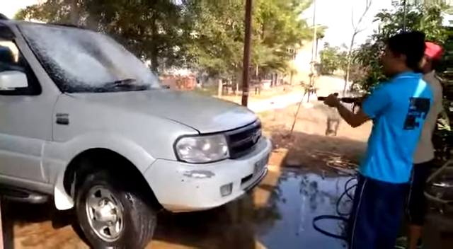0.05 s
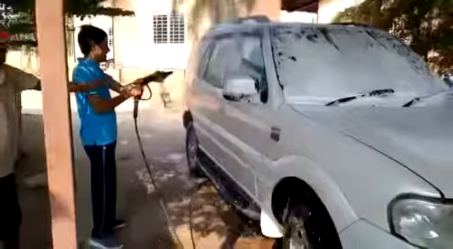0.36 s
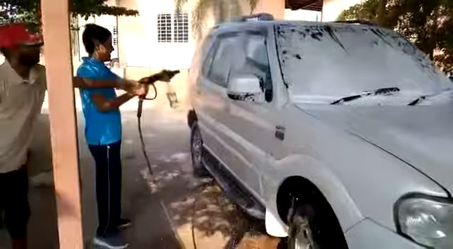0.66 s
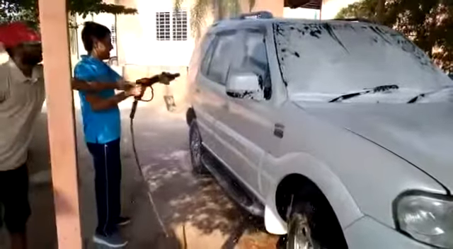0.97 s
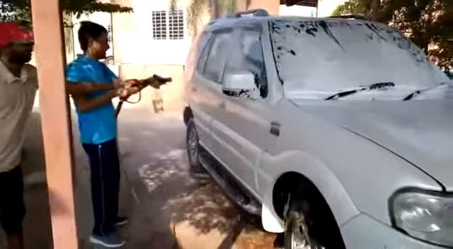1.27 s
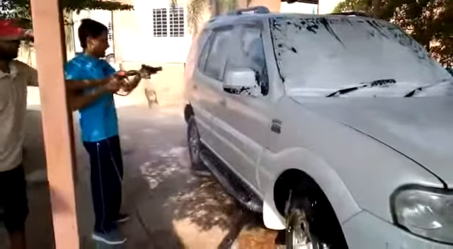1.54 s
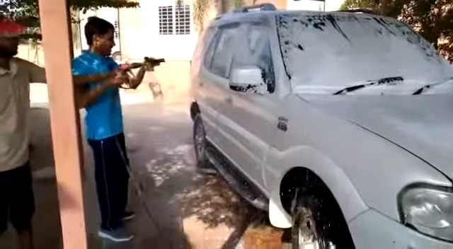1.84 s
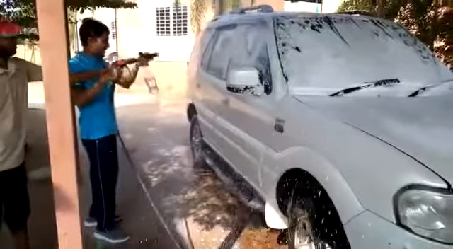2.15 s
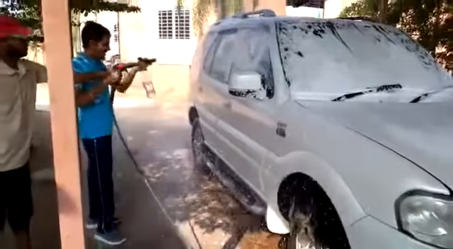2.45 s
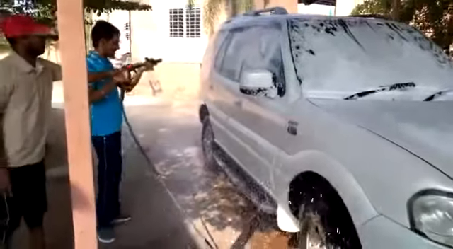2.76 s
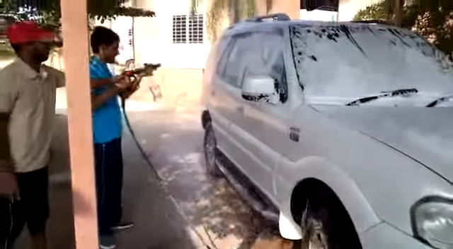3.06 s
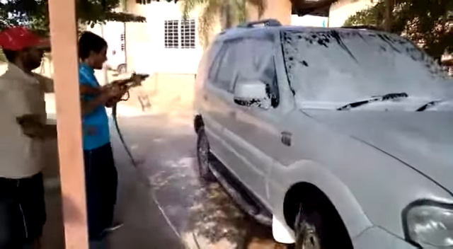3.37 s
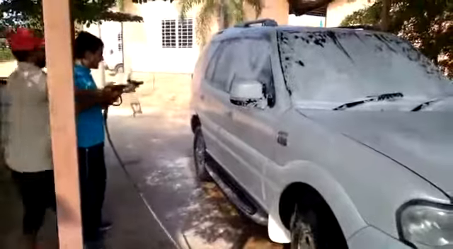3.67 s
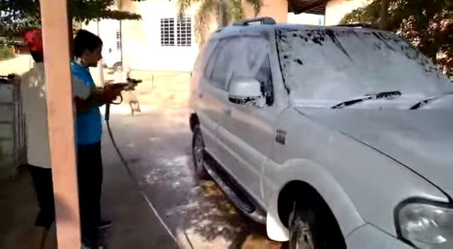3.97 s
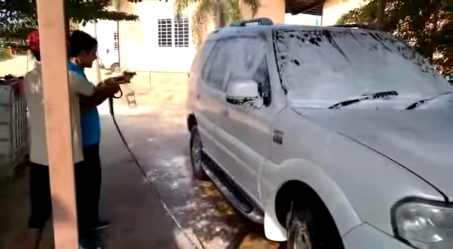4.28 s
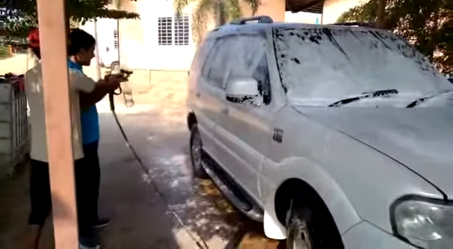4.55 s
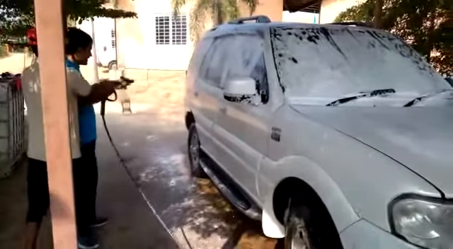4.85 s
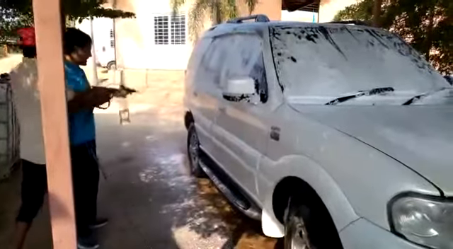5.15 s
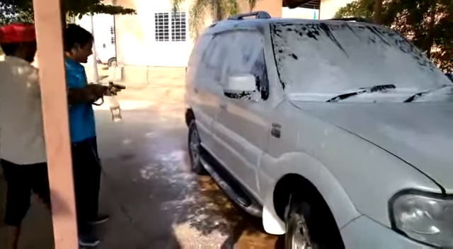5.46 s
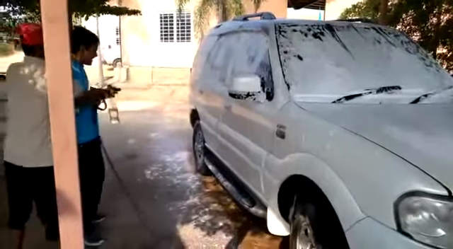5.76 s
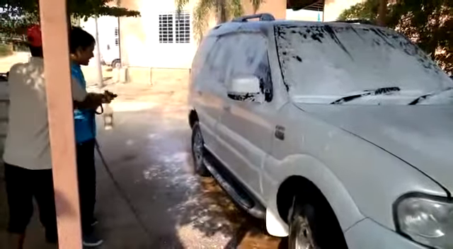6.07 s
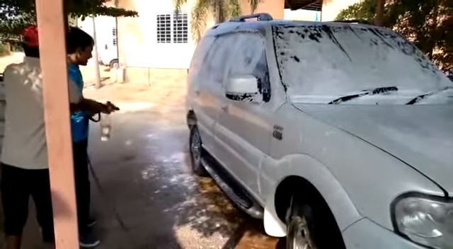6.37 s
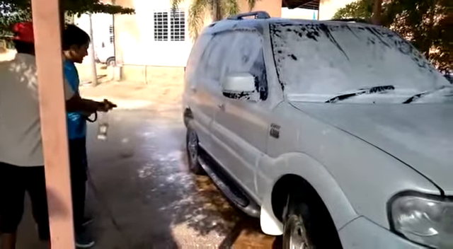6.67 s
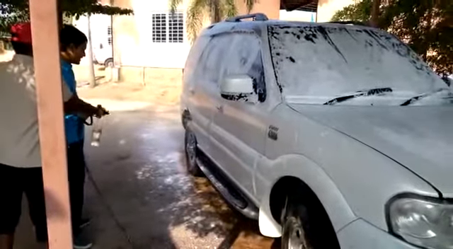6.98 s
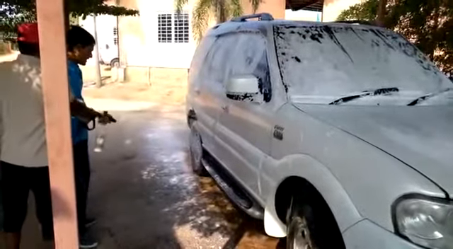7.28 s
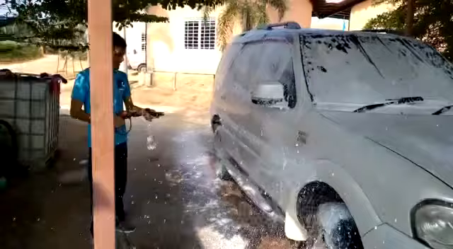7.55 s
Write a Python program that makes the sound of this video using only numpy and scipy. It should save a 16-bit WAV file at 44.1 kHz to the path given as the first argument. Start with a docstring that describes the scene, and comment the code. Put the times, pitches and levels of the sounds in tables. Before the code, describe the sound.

A pressure washer sprays a car outdoors from the very start: a shrill, steady hiss with a fine spatter of drops, its tone shifting as the jet moves across the bodywork. Behind it the motor and pump hum at a constant pitch with a fast, light rattle, over faint yard noise. The spray is strong around 0.7 to 1.4 seconds, then a little softer, drumming lightly on a metal panel at about 2.3 and 2.9 seconds. Near 4 seconds it eases and the hum swells forward. The jet returns by 4.6 seconds and drums again around 5. From about 5.4 to 6.8 seconds the spray is weaker, with two more dips, and the hum stands out. At 7.1 seconds the jet surges with a soft, low thump, hissing and drumming until the end at about 7.6 seconds. Overall loudness stays nearly even throughout.

```python
"""A yard, where a pressure washer rinses a car. The jet hisses from the nozzle, bursts into mist
and drops on the bodywork and now and then drums on a panel. Behind it the motor and three-piston
pump hum steadily over the yard's noise. The camera's gain control holds the loudness, so the hum
swells whenever the spray gets quieter."""
import sys
import numpy as np
from scipy import signal
from scipy.fft import rfft, irfft, next_fast_len
from scipy.io import wavfile
from scipy.ndimage import uniform_filter1d, map_coordinates

SR = 44100
rng = np.random.default_rng(int(sys.argv[2]) if len(sys.argv) > 2 else 0)


def master(y):
    """Save y as 16-bit WAV."""
    cut = np.clip(np.atleast_2d(y).T, -1, 1)
    pcm = np.round(cut * 32767)  # scale
    wavfile.write(sys.argv[1], SR, pcm.astype(np.int16))


N = 336042
TIME_S = np.arange(N) / SR


# Spray strength along the car: t/s, level/dB
SPRAY_SWEEP = [(0, -13), (.35, -15), (.68, -10.5), (1.35, -11.5), (1.8, -16.5), (2.26, -15.5),
               (2.42, -18.5), (2.85, -18.5), (3.3, -14.5), (4.62, -15), (4.85, -10), (5.22, -13),
               (5.38, -22), (6.2, -18.5), (6.87, -17), (7.11, -17.5), (7.135, -9), (7.62, -10)]
# Spray lulls: start/s, fade/s, hold/s, return/s, depth at hold start/dB, depth at hold end/dB
SPRAY_LULLS = [(3.77, 0.4, 0.21, 0.16, 10, 9), (5.578, 0.27, 0.14, 0.094, 3.5, 12),
               (6.417, .14, 0.23, .04, 10, 5)]

def spray():
    """One fan of water, swept by hand, drives hiss, splash and drumming."""
    lull_db = sum(np.interp(TIME_S, np.cumsum([start, fade, hold, back]), [0, first_db, last_db, 0])
                  for start, fade, hold, back, first_db, last_db in SPRAY_LULLS)
    sway_db = 0.21 * wobble(8.8)
    spray_db = curves(SPRAY_SWEEP)[0] - lull_db + sway_db
    tremble = wobble(13)
    return jet(spray_db + 0.29 * tremble) + splash(spray_db + 0.18 * tremble) + panel_drum(spray_db)


# Jet spectrum: f/Hz, relative level/dB
JET_SPECTRUM = [(300, -49.5), (2000, -31.5), (4000, -20), (7000, -13.5), (8450, -9.7), (9100, -4.2),
                (9500, -1.4), (9950, -1.7), (10500, -4.5), (11300, -9.5), (12800, -16.5), (14200, -23),
                (15000, -50), (15500, -58)]
# Lance position between the microphone ports: t/s, left lag/us, direct power share/1
LANCE_PATH = [(0, 13, 0.16), (1.1, 0, 0.32), (1.55, -22, 0.13), (1.9, 3, 0.32), (2.7, 1, 0.3),
              (3.4, 27, 0.23), (4.1, 55, 0.27), (4.8, 52, 0.32), (6.2, 34, 0.12), (7.62, 55, 0.24)]
# Shrill top, waning as the lance turns aside: t/s, resonance gain/dB, top treble gain/dB
NOZZLE_FOCUS = [(0, -0.5, -2.5), (1.9, 2, 2.5), (3.4, 1, 1), (4.2, -2.4, -1), (7.62, -2, -1.2)]

def jet(level_db):
    """The nozzle hisses: part comes straight from the moving lance, the rest off car and walls."""
    lag_us, direct_share = curves(LANCE_PATH)
    source = rush(JET_SPECTRUM, patchy_db=1.2, ring_db=1.3)[0]
    delayed = map_coordinates(source, [np.arange(N) - lag_us * SR / 1e6])
    direct = np.array([delayed, source])
    reflected = rush(JET_SPECTRUM, patchy_db=1.3, ring_db=2)
    hiss = np.sqrt(direct_share) * direct + np.sqrt(1 - direct_share) * reflected
    shrill_db, top_db = curves(NOZZLE_FOCUS)
    hiss = lifted(hiss, shrill_db, centre_hz=9760, width_hz=880)
    hiss = lifted(hiss, top_db, centre_hz=12000, width_hz=1800)
    return panned(amp(level_db + 0.63 * wobble(40)) * hiss, left_db=1.5)


# Splash spectrum: f/Hz, relative level/dB
SPLASH_SPECTRUM = [(300, -22), (1200, -18.5), (2000, -6.5), (2700, -1.5), (3600, 2.5), (5000, 2), (6500, 0),
                   (8000, -4.5), (11000, -3.5), (15000, -38)]
# How much of the jet bursts into splash: t/s, splash over jet/dB
SPLASH_RATIO = [(0, -7), (.36, -3.5), (.6, -7), (1.3, -5.2), (1.8, -5.5), (2.55, -3.5), (3.6, -7.5),
                (4.8, -10), (5.5, -10.5), (7, -10.3), (7.25, -9), (7.62, -7)]
# Jet slips past an edge: middle/s, length/s, splash gain/dB
EDGE_SLIPS = [(2.29, 0.14, -2.5), (3.73, 0.11, -3), (4.6, .2, 1.5), (5.17, 0.27, -4.5), (6.5, .16, -0.5),
              (6.88, 0.13, -6)]
# Jet rings a wheel arch, rim or door gap: middle/s, length/s, f/Hz, width/Hz, gain/dB
CAVITY_RINGS = [(.34, 0.3, 2520, 600, 4.5), (.37, 0.32, 3800, 600, 3.5), (.63, 0.32, 4130, 900, 4.5),
                (1.0, 1, 7000, 1600, 3.5), (1.1, 0.6, 3560, 200, 5), (1.44, .24, 3450, 350, 7.5),
                (2.07, 0.29, 3100, 550, -1), (2.55, 0.49, 2900, 400, 5), (2.93, 0.41, 2820, 350, 5.5),
                (2.955, .12, 2100, 260, 8), (3.55, 0.16, 3300, 700, 3), (3.85, 0.15, 2660, 700, 4),
                (6.17, 0.16, 7300, 1600, 8), (6.62, 0.32, 2800, 400, 4), (7.0, 0.18, 2370, 130, 14)]

def splash(spray_db):
    """Water bursts into mist and drops; each spot it hits answers with other resonances."""
    mist = rush(SPLASH_SPECTRUM, patchy_db=1.0, ring_db=2.9, cavities=CAVITY_RINGS)
    drops = amp(-6.5) * droplets(SPLASH_SPECTRUM, rate_hz=1200, spread_db=6)
    level_db = spray_db + curves(SPLASH_RATIO)[0] + passes_db(EDGE_SLIPS) + 0.78 * wobble(38)
    return panned(amp(level_db) * unit(mist + drops), left_db=1.0)


def droplets(spectrum, rate_hz, spread_db):
    """Dense tiny impacts of uneven size, rms 1."""
    hits = (rng.random((2, N)) < rate_hz / SR) * rng.choice([-1, 1], size=(2, N))
    sizes = amp(spread_db * np.minimum(rng.exponential(size=(2, N)), 4))
    return unit(filtered(hits * sizes, lambda hz: amp(along(spectrum, hz))))


# Sheet metal spectrum: f/Hz, relative level/dB
PANEL_SPECTRUM = [(40, -28), (200, 0), (450, -2.5), (700, 1), (950, -2.5), (1200, 5.5), (1450, 2.5),
                  (1700, 3), (2020, 4), (2250, 1.5), (3000, -0.5), (5000, -16.5)]
# Jet crosses a flat panel: middle/s, length/s, gain/dB, ring f/Hz, ring gain/dB
PANEL_CROSSINGS = [(2.34, 0.24, 8.5, 670, 6), (2.9, 1.1, 3, 640, 1), (4.92, 0.74, 4.5, 750, 6.5),
                   (7.482, 1.1, 4.5, 750, 9)]

def panel_drum(spray_db, offset_db=-25.5, ring_width_hz=110):
    """The jet shakes the sheet metal; flat panels drum louder, each at its own pitch."""
    rings = [(middle_s, length_s, hz, ring_width_hz, db) for middle_s, length_s, _, hz, db in PANEL_CROSSINGS]
    metal = rush(PANEL_SPECTRUM, patchy_db=1.0, ring_db=2.7, cavities=rings)
    return amp(spray_db + offset_db + passes_db(PANEL_CROSSINGS) + 1.6 * wobble(30)) * metal


def jolt(start_s, level_db, hz, t60_s):
    """A soft, low thump where the spray suddenly surges."""
    age_s = np.maximum(TIME_S - start_s, 0)
    return amp(level_db - 60 * age_s / t60_s) * np.sin(2 * np.pi * hz * age_s)


SHAFT_HZ = 24.648
# Main lines of motor and pump: shaft order/1, level/dB
PUMP_LINES = [(2, -66), (4, -64), (5, -63), (6, -40), (8, -59), (9, -48), (12, -48.5), (13, -55), (15, -60),
              (16, -55.5), (18, -55.5), (19, -56), (20, -56), (21, -59.5), (22, -57.5), (27, -54.5),
              (28, -56.5), (30, -54), (33, -57.5), (35, -57.5), (54, -55.5), (56, -56), (59, -52.5),
              (62, -54), (65, -54), (66, -55.5), (75, -56.5), (82, -53), (85, -55.5), (88, -51),
              (93, -55.5)]
# Other lines, coloured by the housing: f/Hz, level/dB
HOUSING_SPECTRUM = [(50, -80), (150, -66), (400, -64), (600, -62), (850, -63), (1000, -66.5), (1100, -65),
                    (1450, -60), (1750, -60.5), (1950, -65), (2100, -59.5), (2400, -65), (2700, -61),
                    (2850, -63)]
# Line waver: f/Hz, amplitude share/1
LINE_WAVER = [(150, .02), (220, .08), (750, .12), (1400, .25)]

def pump(scatter_db, left_lag_s, diffuse_hz, drift_turns, bass_right_db, size=8192):
    """Each shaft turn repeats one pattern of piston strokes: a hum with valve rattle."""
    orders = np.arange(2, 116)
    hz = orders * SHAFT_HZ
    level_db = along(HOUSING_SPECTRUM, hz) + scatter_db * rng.uniform(-1, 1, len(orders))
    for order, db in PUMP_LINES:
        level_db[orders == order] = db
    # walls scramble the phase between the ports, more for higher lines
    apart_rad = 2 * np.pi * hz * left_lag_s + hz / diffuse_hz * rng.standard_normal(len(orders))
    # piston lines stay nearly in step: one thud per stroke
    phase_spread = np.where(orders % 3 == 0, .25, 1)
    phase_rad = phase_spread * rng.uniform(0, 2 * np.pi, len(orders))
    phase_rad = phase_rad + np.array([-apart_rad, apart_rad]) / 2
    lean_db = np.outer([-.5, .5], bass_right_db / (1 + (hz / 300) ** 2))
    lines, unsteady = np.zeros((2, 2, size // 2 + 1), complex)
    lines[:, orders] = amp(level_db + lean_db) * np.exp(1j * phase_rad) * size / np.sqrt(2)
    # no two turns are quite alike
    waver = along(LINE_WAVER, hz) * np.exp(2j * np.pi * rng.random(len(orders)))
    unsteady[:, orders] = lines[:, orders] * waver
    turns = SHAFT_HZ * TIME_S + drift_turns * wobble(9)
    index = (turns % 1 * size).astype(int) % size
    hum = irfft(lines, size)[:, index]
    hum += sum(wobble(7) * irfft(part, size)[:, index] for part in (unsteady, 1j * unsteady))
    rattle = valves(turns, level_db=-43)
    return hum * amp(0.3 * wobble(12)) + rattle


# Valve noise spectrum: f/Hz, relative level/dB
VALVE_SPECTRUM = [(80, -12), (200, -7), (450, 2.5), (800, 2), (1000, 2), (1500, 7), (2200, 9), (2800, 13.5),
                  (4000, -28), (9000, -29)]

def valves(turns, level_db):
    """Valve noise swells at each of the three strokes of a turn."""
    strokes = 1 + np.cos(2 * np.pi * 3 * turns) / 2
    return amp(level_db) * unit(strokes * rush(VALVE_SPECTRUM, patchy_db=2.7))


# Mains hum: f/Hz, level/dB
MAINS_LINES = [(100, -68), (300, -60.5)]

def motor_hum():
    """The motor's iron hums at mains harmonics, beating slowly against the pump's lines."""
    return sum(amp(db) * np.sqrt(2) * np.sin(2 * np.pi * (hz * TIME_S + rng.random()))
               for hz, db in MAINS_LINES)


# Yard noise spectrum: f/Hz, relative level/dB
YARD_SPECTRUM = [(15, 3), (40, -7), (100, 3.5), (200, -1.5), (400, -0.5), (900, -13), (2000, -6),
                 (5000, -8), (12000, -14.5)]

def yard(level_db):
    """Steady outdoor noise, strongest in the bass."""
    return amp(level_db) * rush(YARD_SPECTRUM, patchy_db=1)


# Left-right likeness of the noise: f/Hz, correlation/1
STEREO_CORRELATION = [(60, 0.036), (200, 0.36), (600, 0.54), (1400, 0.071), (3000, 0.12), (8000, 0)]

def rush(spectrum, patchy_db, ring_db=0, cavities=(), size=1536):
    """Stereo noise, rms 1, with broad random patches, fleeting resonances and passing cavity rings."""
    hz, t, bins = signal.stft(rng.standard_normal((2, N)), SR, nperseg=size)
    patches, rings = rng.standard_normal((2, *bins.shape[1:]))
    patches = uniform_filter1d(uniform_filter1d(patches, 14, axis=0), 3, axis=1)  # 400 Hz by 50 ms
    rings = uniform_filter1d(uniform_filter1d(rings, 3, axis=0), 7, axis=1)  # 90 Hz by 120 ms
    cavity_db = sum(db * np.outer(bell(hz, centre_hz, width_hz), hump(t, middle_s, length_s))
                    for middle_s, length_s, centre_hz, width_hz, db in cavities)
    gain = amp(along(spectrum, hz)[:, None] + patchy_db * unit(patches) + ring_db * unit(rings) + cavity_db)
    width_rad = np.arccos(along(STEREO_CORRELATION, hz))[:, None] / 2
    bins = bins * gain * [np.cos(width_rad), np.sin(width_rad)]
    mid, side = signal.istft(bins, nperseg=size)[1][:, :N]
    return unit(np.array([mid + side, mid - side]))


def amp(db):
    """Decibels to gain."""
    return 10 ** (np.asarray(db) / 20)


def unit(x):
    """x at rms 1."""
    return x / np.sqrt(np.mean(x ** 2) + 1e-20)


def along(points, hz):
    """(f/Hz, value) points read on a log axis."""
    knots_hz, values = np.transpose(points)
    return np.interp(np.log(hz + 1), np.log(knots_hz + 1), values)


def curves(rows):
    """One value per sample for each column after t/s."""
    knots_s, *columns = np.transpose(rows)
    return [np.interp(TIME_S, knots_s, column) for column in columns]


def hump(t, middle_s, length_s):
    """Smooth swell from 0 to 1 and back."""
    return np.cos(np.pi * np.clip((t - middle_s) / length_s, -.5, .5)) ** 2


def passes_db(rows):
    """Sum of one swell per row."""
    return sum(db * hump(TIME_S, middle_s, length_s) for middle_s, length_s, db, *_ in rows)


def wobble(rate_hz, step=64):
    """Smooth random curve, rate_hz knots a second."""
    at = np.arange(0, N + step, step)
    knots = rng.standard_normal(int(N * rate_hz / SR) + 4)
    return np.interp(np.arange(N), at, map_coordinates(knots, [at * rate_hz / SR]))


def bell(hz, centre_hz, width_hz):
    """Gaussian band, peak 1."""
    return np.exp(-((hz - centre_hz) / width_hz) ** 2)


def filtered(x, response):
    """x through a frequency response."""
    size = next_fast_len(N + 8192)
    return irfft(rfft(x, size) * response(np.fft.rfftfreq(size, 1 / SR)), size)[..., :N]


def lifted(x, lift_db, centre_hz, width_hz):
    """x with one band raised or lowered by a curve."""
    return x + (amp(lift_db) - 1) * filtered(x, lambda hz: bell(hz, centre_hz, width_hz))


def panned(x, left_db):
    """x with the left channel left_db above the right."""
    return x * amp([[left_db / 2], [-left_db / 2]])


def scene():
    """Spray in front; pump, motor and yard behind."""
    background = yard(level_db=-45)
    background += pump(scatter_db=6, left_lag_s=0.00027, diffuse_hz=2900,
                       drift_turns=0.00088, bass_right_db=3)
    background += motor_hum()
    return spray() + jolt(start_s=7.113, level_db=-30, hz=115, t60_s=0.044) + background


def gain_control(x, target_db, slope, memory_s, ahead_samples=700):
    """Follows the running power: the gain drops quickly as the sound grows and creeps back after."""
    power = np.pad(np.mean(x ** 2, axis=0), (0, ahead_samples), mode="reflect")[ahead_samples:]
    pole = np.exp(-1 / (memory_s * SR))
    start_power = np.mean(power[:SR // 20])
    running_power = signal.lfilter([1 - pole], [1, -pole], power, zi=[pole * start_power])[0]
    return x * amp(slope * (target_db - 10 * np.log10(running_power + 1e-12)))


def record(dry):
    """The camera levels the sound, rounds the highest peaks and cuts all above its band limit."""
    levelled = gain_control(dry, target_db=-8.0, slope=0.89, memory_s=0.024)
    rounded = levelled / (1.5 + levelled ** 10) ** (1 / 10)
    return filtered(rounded, lambda hz: hz < 15300)


dry = scene()
out = record(dry)
master(out)
```